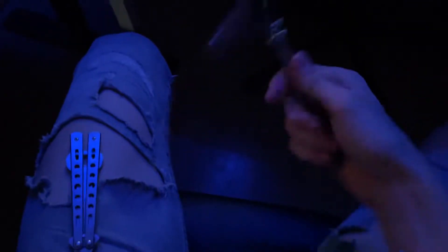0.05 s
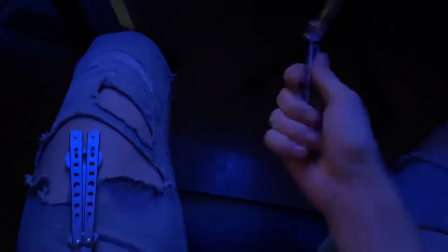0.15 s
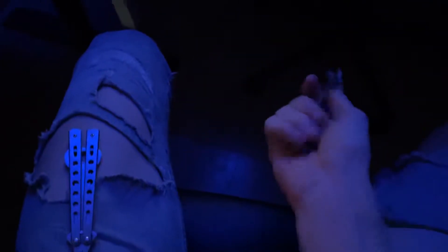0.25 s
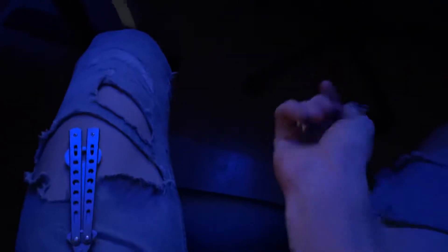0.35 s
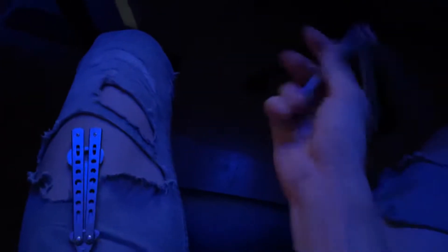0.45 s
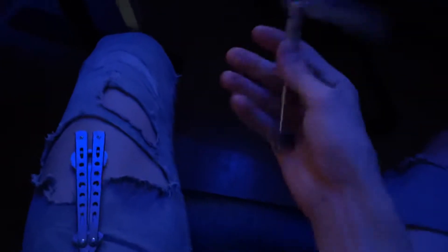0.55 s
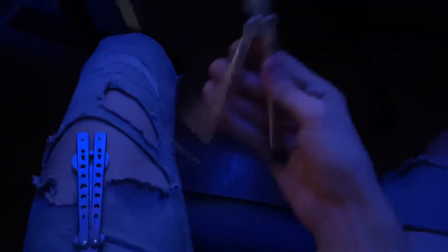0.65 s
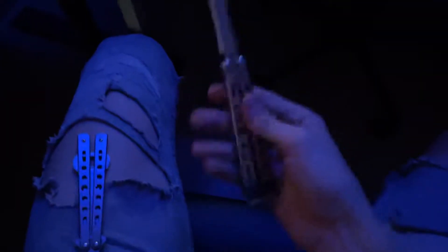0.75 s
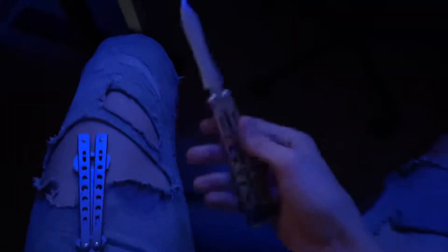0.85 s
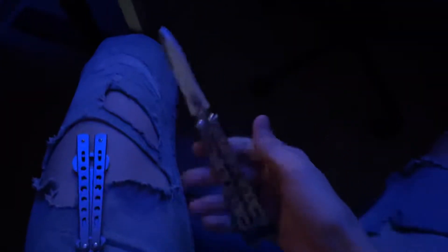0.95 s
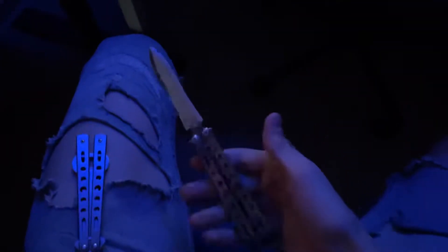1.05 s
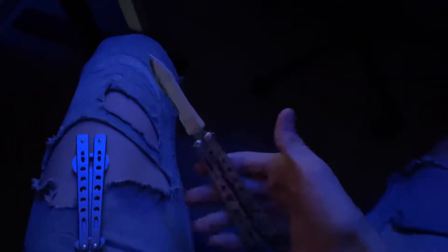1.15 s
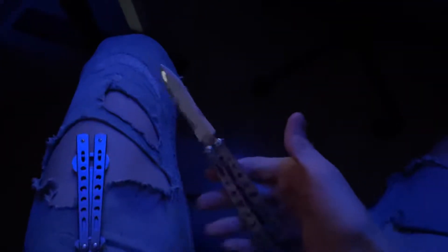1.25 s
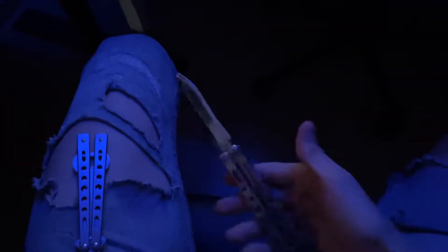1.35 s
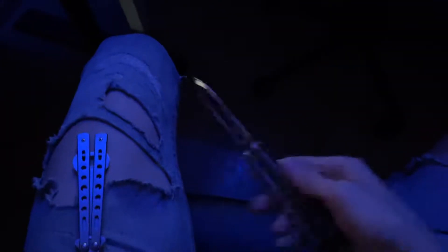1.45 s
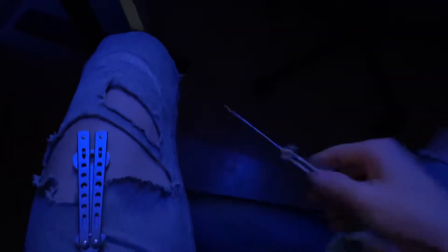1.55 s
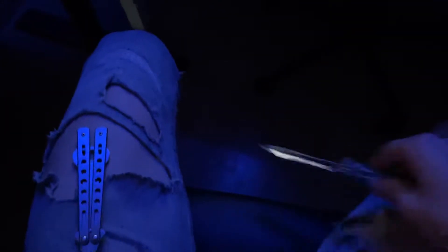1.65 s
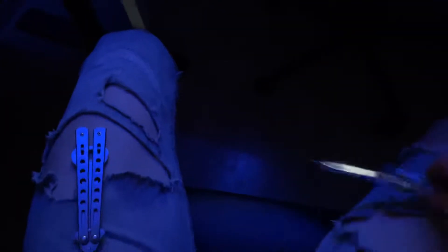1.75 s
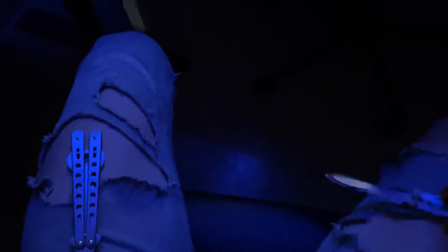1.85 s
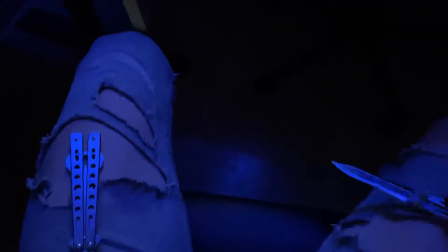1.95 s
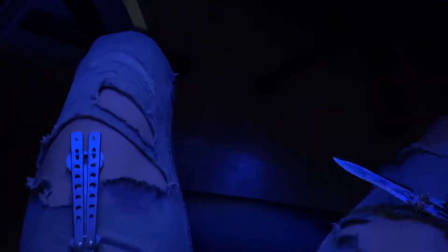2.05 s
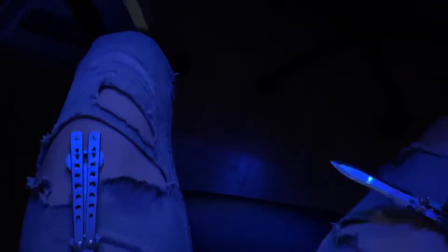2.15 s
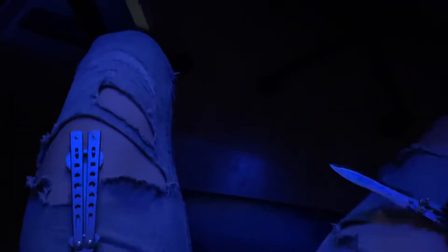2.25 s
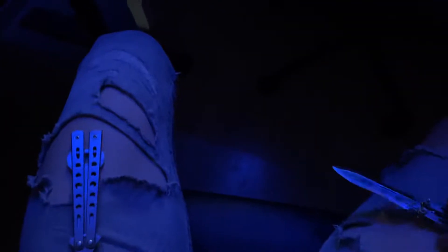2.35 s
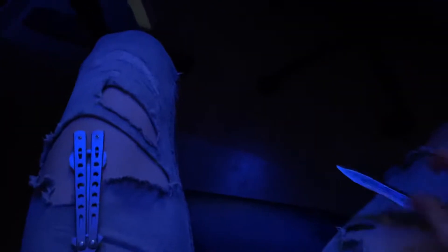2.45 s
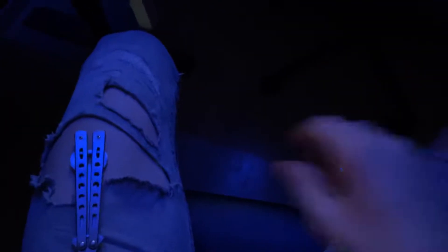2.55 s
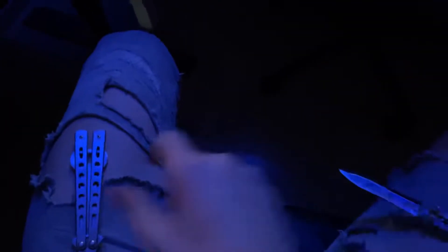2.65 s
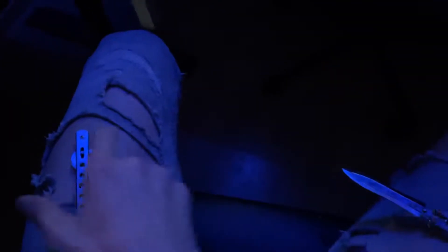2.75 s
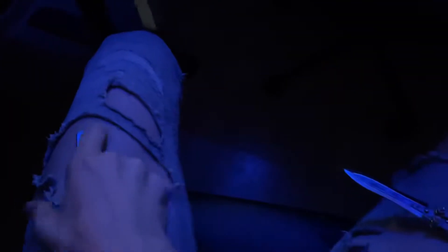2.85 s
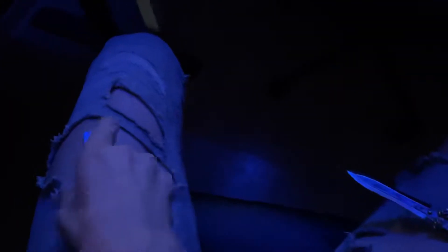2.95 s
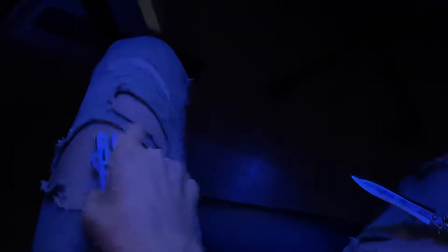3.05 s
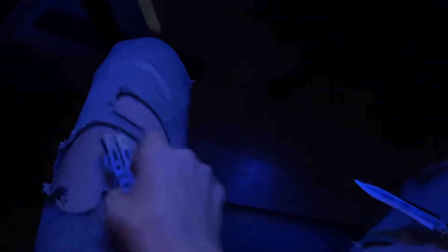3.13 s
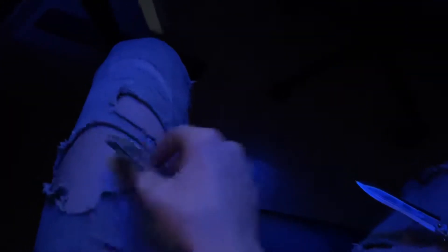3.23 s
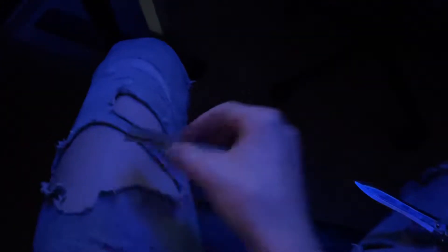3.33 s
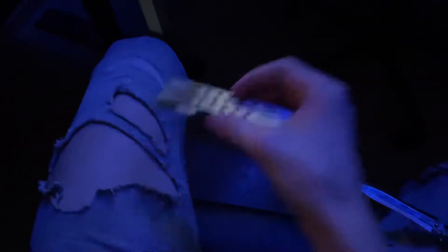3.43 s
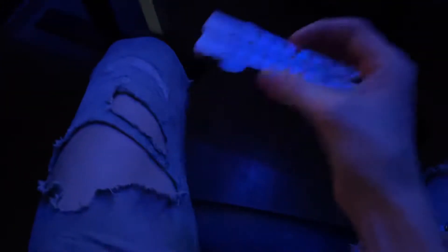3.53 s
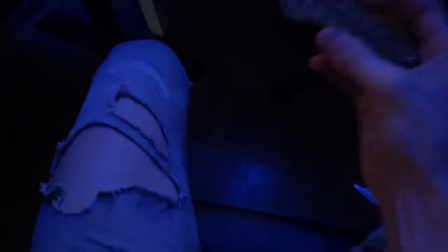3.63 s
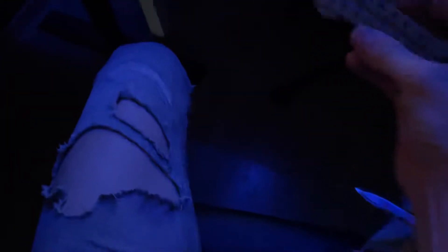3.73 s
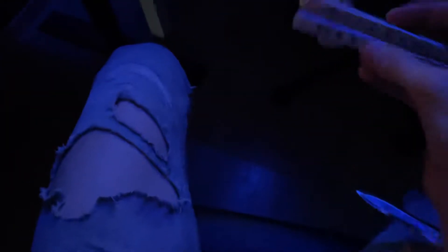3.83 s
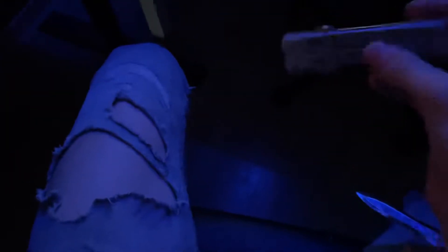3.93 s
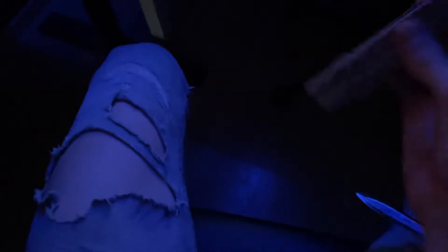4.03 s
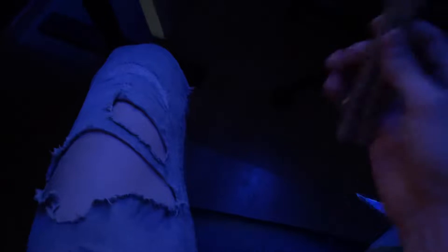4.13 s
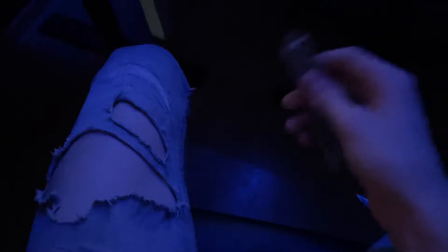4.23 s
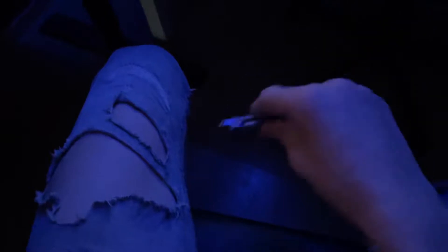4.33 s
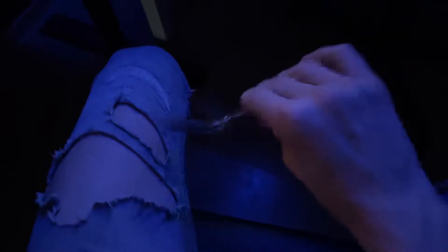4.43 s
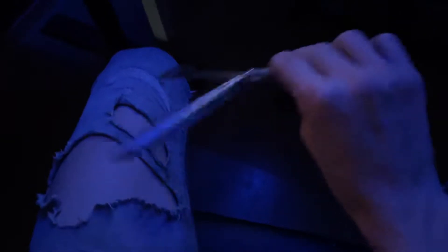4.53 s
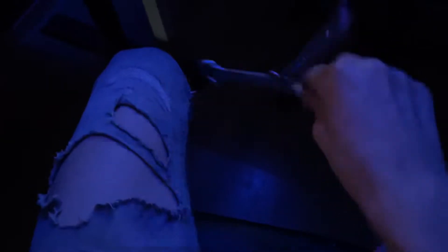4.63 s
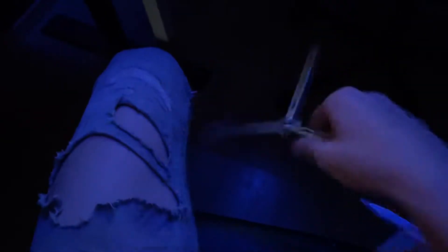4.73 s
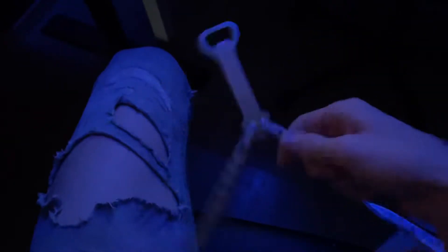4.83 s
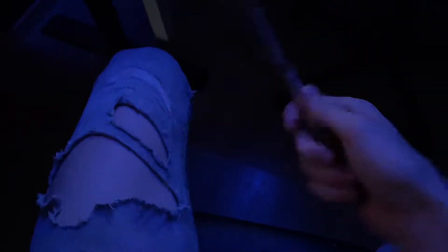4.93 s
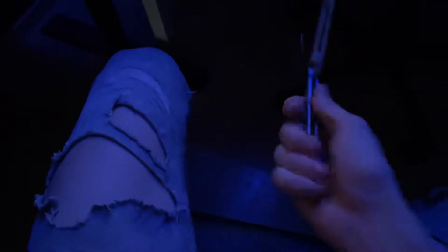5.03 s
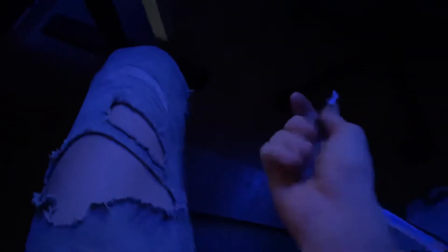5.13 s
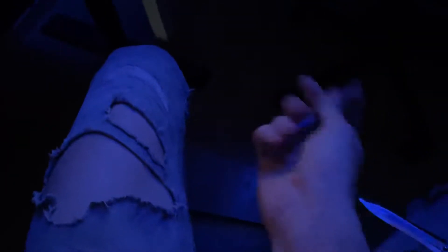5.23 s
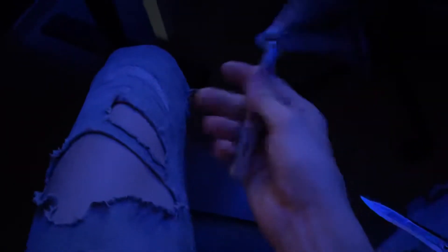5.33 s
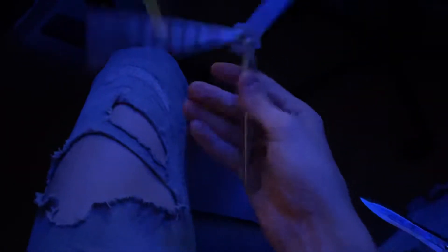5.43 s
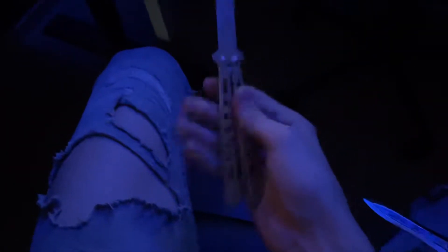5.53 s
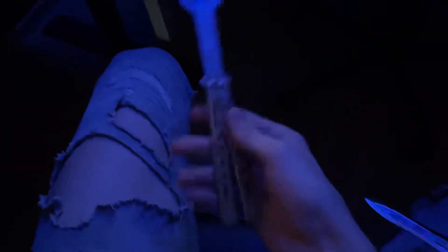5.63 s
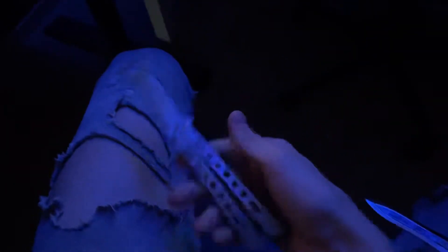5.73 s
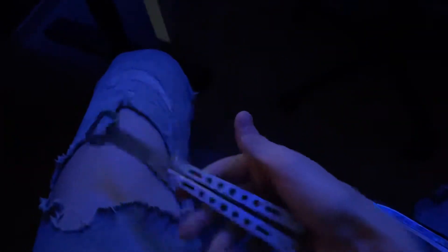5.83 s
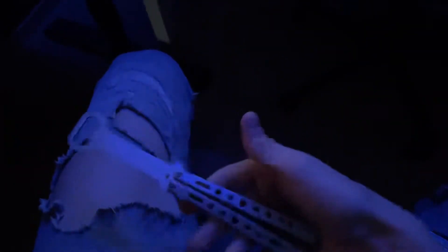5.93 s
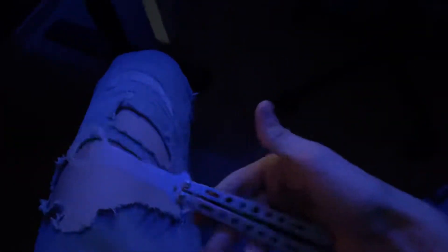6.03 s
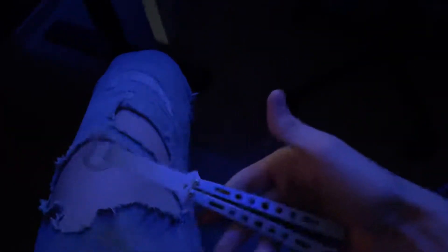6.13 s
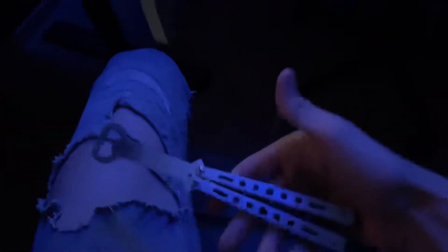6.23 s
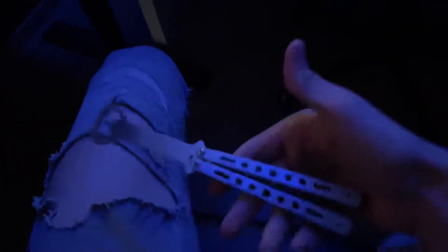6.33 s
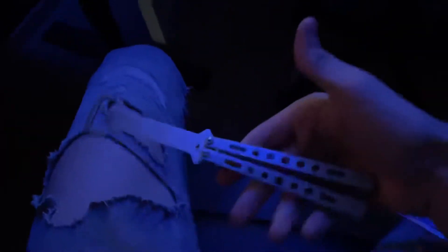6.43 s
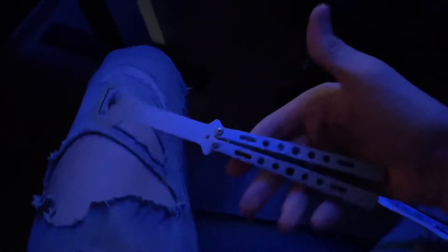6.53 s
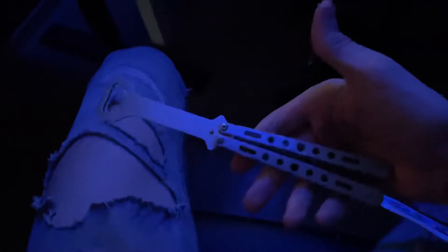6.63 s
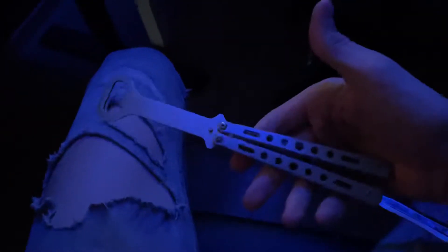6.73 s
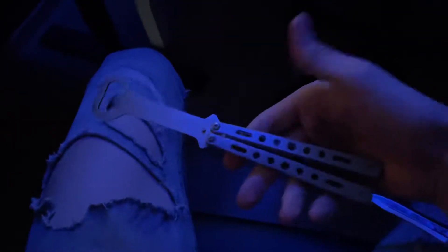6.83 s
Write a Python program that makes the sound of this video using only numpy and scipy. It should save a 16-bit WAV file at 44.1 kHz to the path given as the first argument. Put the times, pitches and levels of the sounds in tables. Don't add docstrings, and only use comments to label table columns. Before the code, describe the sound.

A phone sits close to the hands in a small furnished room, where a fan drones quietly with low hum and a faint wandering whine. From 0.1 s a folding steel knife flips with light clicks and rustling fingers, building to two loud, crisp clacks at about 0.65 s as it lands in the palm. Small clicks trail off; a soft tap comes near 1.5 s, then almost only the fan. At 2.8 s cloth and fingers rustle and a second knife ticks, with taps and pin clicks until 4.0 s. A dense rattling burst follows at 4.1-4.3 s, with short singing scrapes. One hard catch snaps at 4.6 s. Handles slam at 5.2 s, leaving a thin bright ring, and again at 5.5 s. A soft rubbing tap at 5.8 s ends the flipping, leaving the fan and barely audible ticks until nearly 7 s.

```python
import sys
import numpy as np
from scipy import signal
from scipy.fft import rfft, irfft, next_fast_len
from scipy.io import wavfile
from scipy.ndimage import uniform_filter1d

SR = 44100
rng = np.random.default_rng(int(sys.argv[2]) if len(sys.argv) > 2 else 0)


def put_to_file(sound):
    columns = np.atleast_2d(sound).T
    safe = np.clip(columns, -1, 1)
    whole_steps = np.round(safe * 32767)
    wavfile.write(sys.argv[1], SR, whole_steps.astype(np.int16))


def boost_factor(decibels):
    exponent = np.asarray(decibels, float) / 20
    return 10 ** exponent


N = 303408
KNOCK_N = 4096

# (frequency [Hz], level [dB per Hz])
FAN_MID = [(25, -26.5), (55, -4.5), (76, -14.5), (141, -3), (170, -12), (256, -5), (360, -17.5),
           (451, -9.5), (503, -22), (1480, -27.5), (2160, -40.5), (6800, -54), (7400, -56.5),
           (13000, -60.5)]
# (frequency [Hz], level [dB per Hz])
FAN_SIDE = [(24, -43), (40, -15), (140, -0.5), (167, -8), (262, -3.5), (320, -8.5), (455, -4.5), (697, -15),
            (1070, -9.5), (1150, -17), (1480, -14.5), (2570, -32.5), (16000, -56)]
# (frequency [Hz], width [Hz], level [dB rms])
FAN_HUM = [(46.9, 4.5, -69), (106.8, 12.7, -74.5), (140.33, 2.3, -63.5), (212.3, 17, -68),
           (340.3, 36.8, -71), (468, 4.7, -81.5), (468, 5.5, -75), (1072, 4, -81)]
# (time [s], frequency [Hz], level [dB])
FAN_WHINE = [(0, 1450, -98), (0.699, 1452, -83), (1.351, 1505, -86), (1.701, 1510, -117),
             (3.098, 1510, -87.5), (3.499, 1470, -84.5), (3.999, 1440, -82), (4.799, 1430, -94.5),
             (5.501, 1430, -83.5), (5.752, 1460, -83.5), (6.099, 1510, -82), (6.4, 1510, -88.5),
             (6.88, 1535, -87)]
# (frequency [Hz], time to fall 60 dB [s])
ROOM_RING = [(500, 0.21), (2000, 0.24), (4000, 0.25), (8000, 0.23), (14000, 0.043)]
# (frequency [Hz], left leads by [radians])
CASE_PHASE = [(6800, -3.5), (7500, -3.0), (8300, -2.1), (9650, -1.5), (11200, 0), (14500, 3.14),
              (15500, 3.7), (16500, 4)]
# (time [s], left leads by [ms])
SWING = [(.1, -0.086), (.27, -0.16), (.5, 0.069), (.63, -0.26), (.67, -0.051), (1.45, 0.25), (2.78, 0.088),
         (3.2, -0.014), (4.02, -0.047), (4.1, -.26), (4.22, 0.13), (4.29, 0.46), (4.6, -0.101), (5.0, 0.13),
         (5.2, 0.28), (5.49, -0.12)]
# (start [s], hold [s], level [dB])
RUSTLE = [
    (0.057, 0.75, -75.5),
    (1.268, 0.31, -82.5),
    (1.787, 0.53, -87.5),
    (2.808, 0.31, -67),
    (3.712, 0.35, -76),
    (4.334, 0.047, -61),
    (4.737, 0.076, -69),
    (4.987, 0.21, -80),
    (5.33, 0.16, -73.5),
    (5.843, 0.34, -89.5),
]
# (frequency [Hz], level [dB per Hz])
RUSTLE_COLOUR = [(1200, -28.5), (2200, -11), (4500, -6.5), (8000, -2.5), (12500, -13), (14000, -20)]
# (time [s], level [dB], frequency [Hz])
THUMPS = [
    (0.671, -44, 78.6),
    (1.527, -45, 47),
    (3.4, -44.5, 772),
    (4.602, -29.5, 320),
    (4.606, -34, 124),
    (5.498, -45, 90.3),
]
# (start [s], hold [s], high mode level [dB], low mode level [dB])
SKIDS = [
    (4.091, .006, -42, -41),
    (4.274, .007, -40, -54),
    (4.291, 0.012, -34, -47),
    (4.3065, .005, -30, -32),
    (4.316, .004, -35, -34),
    (5.468, .009, -46, -47),
]
# (frequency [Hz], flutter width [Hz])
SKID_MODES = [(8160, 90), (5150, 29.64)]
# (time [s], level [dB])
LINGER = [
    (2.79, -78),
    (2.9, -76),
    (4.108, -83),
    (4.318, -56.5),
    (4.606, -55),
    (5.187, -40),
    (5.252, -50.5),
    (5.497, -66),
]
# (frequency [Hz], width [Hz], level [dB])
LINGER_MODES = [(2800, 110, -11), (3600, 160, -12), (4400, 200, -11), (5115, 110, -8), (5800, 200, -10),
                (6700, 220, -6), (8250, 200, -3), (9030, 200, -6), (10200, 230, 2), (11200, 300, -4),
                (15600, 150, 5)]
# (frequency [Hz], left minus right [dB])
BLADE_PAN = [(5500, -2), (7800, 5), (8800, 5.5), (10000, -1)]
# (frequency [Hz], level [dB], time to fall 60 dB [s])
STEEL_A = [(3091, -7, .01), (3850, 5.5, 0.0043), (4592, -5.5, 0.027), (5420, 1.5, 0.0333), (6000, -5, 0.03),
           (6810, -8.5, .025), (7300, -16, 0.041), (7950, -7.5, 0.024), (9100, 3.5, 0.016),
           (8977, -4, .022), (10200, -19.5, 0.034), (11400, -23.5, 0.028), (13300, 0, 0.023),
           (15230, -7.5, .03)]
# (frequency [Hz], level [dB], time to fall 60 dB [s])
STEEL_B = [(1076, -18.5, 0.098), (2837, -5, 0.013), (3657, -16.5, 0.034), (4455, -16.5, 0.025),
           (5100, -5, 0.04), (6590, -2, 0.043), (7220, -12, 0.025), (8254, 10, 0.018), (9000, -0.5, 0.058),
           (9600, -19.5, 0.024), (10200, 5.5, 0.016), (10840, 0.5, 0.0072), (12500, -11, 0.032),
           (14000, -15, 0.028), (15600, -2.5, .045)]
# (frequency [Hz], level [dB])
CRACK = [(800, -48.5), (2000, -13), (3000, -11), (4500, 0.5), (6500, 3), (10000, -6.5), (13000, -1),
         (15700, 1.5), (17500, -17)]
# (time [s], level [dB], chatter [ms], brightest [Hz])
CLICKS_A = [(.062, -40, 2.3, 7840), (.1112, -37.5, 3.3, 6350), (.2522, -56, 2.5, 5560),
            (.285, -61, 36, 5000), (.3165, -49, 2.6, 9000), (.4866, -61.5, 11, 8900),
            (.504, -56.5, 21, 3660), (.5505, -52, 5.2, 4000), (.5697, -47, 2.9, 7800),
            (.581, -32.5, 0.62, 9700), (.6, -47, 40, 4174), (.627, -38.5, 4.6, 9000),
            (.6338, -22.5, 3.4, 4700), (.6382, -13, 1.9, 9100), (.638, -23, 2, 13500),
            (.65, -31.5, 9.2, 9000), (.667, -35.5, 2.9, 6000), (.6719, -7.5, 1.2, 9100),
            (.672, -11.5, 2.4, 5900), (.672, -21, 2, 13300), (.6745, -21.5, 3.6, 8880), (.75, -45, 5, 4940),
            (.8173, -42, 0.72, 9000), (.833, -53, 3, 9000), (.428, -63.5, 5.4, 11870),
            (1.3387, -60, 3.66, 8100), (1.4541, -32.5, 3.1, 9620), (.1407, -60, 2.5, 5000),
            (2.1615, -54.5, 3.2, 5960), (2.2753, -59, 4.4, 15050)]
# (time [s], level [dB], chatter [ms], brightest [Hz])
DULL_A = [
    (1.4814, -40, 4, 4500),
    (.2748, -33, 1.9, 11500),
    (.275, -35, 2, 6500),
    (.672, -22, 3.5, 3200),
    (0.2675, -49, 2, 8500),
]
# (time [s], level [dB], chatter [ms], brightest [Hz])
TICKS_B = [(2.783, -26.5, 4.3, 8200), (2.838, -51, 4.4, 3980), (2.885, -67, 4, 6500),
           (2.8937, -27, 2.4, 6300), (2.894, -25, 1.1, 10400), (2.9754, -36, 2.5, 11000),
           (2.976, -37, 2.5, 5000), (3.3285, -40, 4.3, 7800), (3.4173, -50, 3.5, 7400),
           (3.5894, -57, 1.8, 15000), (3.7293, -37.5, 4.3, 15400), (3.7426, -44, 2.1, 10700),
           (3.7633, -49.5, 1.3, 5300), (3.83, -57, 3, 14000), (3.8666, -29.5, 1.6, 15100),
           (3.9905, -45, 2.6, 8100), (4.0149, -29.5, 2.5, 14000), (4.075, -56, 4.2, 6590),
           (4.4589, -36, 1.3, 10200), (4.4982, -46, 8.4, 10200), (4.5184, -44.5, 13, 15300),
           (4.5543, -38.5, 8.3, 6400), (4.8932, -47, 4.2, 6660), (4.972, -43.5, 2.5, 5100),
           (4.978, -45.5, 3.5, 10200), (5.0601, -61, 1.9, 14600), (5.0879, -57.5, 2.4, 6740),
           (5.1465, -50, 3.8, 5340), (5.398, -67, 2.4, 10200), (5.549, -62, 2.5, 10200),
           (5.662, -60, 4.1, 5300), (6.4494, -71, 4.9, 10550), (6.8678, -68, 3.2, 11400)]
# (time [s], level [dB], chatter [ms], brightest [Hz])
CLACKS_B = [(4.0893, -26.5, 3.3, 10500), (4.094, -29, 4.2, 8300), (4.1015, -19, 2.6, 10200),
            (4.102, -23, 2.4, 13500), (4.1052, -14, 0.9, 12500), (4.108, -20, 1.6, 11700),
            (4.1352, -22.5, 3, 10200), (4.1355, -26.5, 3, 15300), (4.22, -27, 1.9, 9350),
            (4.2717, -30, 3, 10800), (4.2795, -34.5, 3, 8300), (4.324, -55.5, 1.6, 10200),
            (4.6055, -7, 1, 10900), (4.608, -21, 2.6, 10840), (5.1695, -25, 2.3, 10200),
            (5.172, -23, 2.6, 6900), (5.173, -24.5, 4.3, 5100), (5.179, -28.5, 2, 10200),
            (5.182, -15, 2.2, 10200), (5.1845, -14.5, 4, 10200), (5.1835, -13.5, 2.1, 5200),
            (5.1885, -26, 10, 10150), (5.2315, -33.5, 9.6, 10100), (5.2471, -18, 2.4, 12500),
            (5.2525, -25, 7.5, 10500), (5.464, -27.5, 2.5, 11700), (5.4645, -26.5, 2, 6500),
            (5.4698, -35, 4, 7000), (5.4803, -27, 2.4, 6600), (5.4815, -21.5, 2.2, 10700),
            (5.4915, -29.5, 4.6, 8960), (5.4945, -15.5, 3.2, 11500), (5.4978, -16.5, 3.8, 10840),
            (5.5045, -29, 3, 12000), (5.506, -36, 2.3, 6590)]
# (time [s], level [dB], chatter [ms], brightest [Hz])
RINGS_B = [(2.8188, -48, 9.4, 8140), (3.7165, -46, 3.8, 2810), (4.091, -34.5, 3, 2730),
           (4.105, -25.5, 3.4, 3620), (4.2068, -46, 3.7, 5200), (4.279, -27, 2, 8200),
           (4.2915, -20, 2, 11600), (4.2945, -30, 3.7, 10200), (4.301, -27, 2.4, 10200),
           (4.2925, -29.5, 5, 4503), (4.293, -39, 6.5, 2580), (4.306, -23.5, 2.55, 10200),
           (4.3095, -18.5, 2.3, 15600), (4.315, -30.5, 4.9, 8300), (4.386, -40.5, 19, 10200),
           (4.7699, -50, 2.2, 7760), (4.7996, -52.5, 1.5, 5420), (5.0015, -49, 1.8, 6697),
           (5.246, -28, 6.7, 2587)]
# (time [s], level [dB], chatter [ms], brightest [Hz])
DULL_B = [
    (3.0936, -39, 4.5, 10100),
    (3.1535, -31.5, 1.55, 12900),
    (3.5949, -52, 2.56, 14620),
    (3.7151, -40, 4.1, 9630),
    (4.6006, -17, 0.66, 11700),
    (4.6023, -12.5, 0.9, 11000),
    (4.7207, -35, 12, 15700),
    (5.4946, -16, 2.07, 6100),
    (5.7949, -33.5, 5, 14800),
]
# (time [s], level [dB], chatter [ms], brightest [Hz])
FLEX_B = [
    (5.17, -37, 9.5, 1140),
    (5.495, -26.5, 2.1, 2210),
    (6, -76, 4.6, 1002),
]


def shape(table, hz):
    table = np.array(table, float)
    return np.interp(np.log(hz + 1), np.log(table[:, 0] + 1), table[:, 1])


def coloured(gain, db):
    x = irfft(rfft(rng.standard_normal(N)) * gain, N)
    return x * boost_factor(db) / x.std()


def walk(rate):
    k = int(SR / rate)
    steps = np.repeat(rng.standard_normal(N // k + 1), k)
    x = uniform_filter1d(uniform_filter1d(steps, k), k)[:N]
    return x / x.std()


def stroke(start, hold, db, rise_db_s, fall_db_s):
    t = np.arange(N) / SR - start
    return boost_factor(db + rise_db_s * np.minimum(t, 0) - fall_db_s * np.maximum(t - hold, 0))


def add(track, s, x):
    i = int(s * SR)
    track[..., i:i + x.shape[-1]] += x[..., :N - i]


def ports(spectrum, hz, lead_ms):
    case = np.clip((hz - 6000.) / 1690.0, 0, 1)
    delay = 2 * np.pi * hz * lead_ms / 1000
    lead = (1 - case) * delay + case * shape(CASE_PHASE, hz)
    return spectrum * np.exp(.5j * np.array([lead, -lead]))


def fan():
    mid_db, side_db, pan_db = -59, -64.5, 2.5
    hz, t = np.fft.rfftfreq(N, 1 / SR), np.arange(N) / SR
    soft = 1 / (1 + (hz / 13200.) ** 20)
    mid = coloured(soft * boost_factor(shape(FAN_MID, hz)), mid_db) * boost_factor(0.077 * walk(3.3))
    for f, width, db in FAN_HUM:
        mid = mid + coloured(1 / (1 + ((hz - f) / (width / 2)) ** 2), db)
    side = coloured(soft * boost_factor(shape(FAN_SIDE, hz)), side_db)
    s, whine_hz, whine_db = np.transpose(FAN_WHINE)
    whine_gain = boost_factor(np.interp(t, s, whine_db) + 6.5 + 1.7 * walk(11))
    mid = mid + whine_gain * np.sin(2 * np.pi * np.cumsum(np.interp(t, s, whine_hz)) / SR)
    return np.array([mid + side, mid - side]) * boost_factor([[pan_db / 2], [-pan_db / 2]])


def room(x):
    room_db, tilt_db_per_octave = -9, -4
    t, hz = np.arange(SR // 2) / SR, np.fft.rfftfreq(SR // 2, 1 / SR)
    tail = 0
    for centre_hz in 250 * 2. ** np.arange(7):
        band = np.exp(-.5 * (np.log2((hz + 1) / centre_hz) / .5) ** 2)
        band = band * boost_factor(tilt_db_per_octave * np.log2(centre_hz / 1000))
        band = band / (1 + (hz / 15900.) ** 20)
        noise = irfft(rfft(rng.standard_normal((3, len(t)))) * band, len(t))
        tail = tail + noise * 1000. ** (-t / shape(ROOM_RING, centre_hz))
    tail = tail * (1 - np.exp(-(t / 0.001) ** 2))
    tail = tail * boost_factor(room_db) / np.sqrt(np.sum(tail[0] ** 2))
    return signal.fftconvolve(x[None], tail, axes=1)[:, :N]


def rustle():
    hiss, hz = 0, np.fft.rfftfreq(N, 1 / SR)
    for centre_hz in (2200, 3000, 4000, 5100, 6600, 8300, 10400, 12500):
        patch = np.exp(-.5 * (np.log2((hz + 1) / centre_hz) / .17) ** 2)
        band = boost_factor(shape(RUSTLE_COLOUR, hz)) * patch
        hiss = hiss + irfft(rfft(rng.standard_normal(N)) * band, N) * boost_factor(4 * walk(22))
    grain_db = .8 * walk(90) + 2.5 * walk(500)
    hiss = hiss / hiss.std() * boost_factor(grain_db)
    return hiss * sum(stroke(*move, rise_db_s=398.5, fall_db_s=139.5) for move in RUSTLE)


def palm():
    out, t = np.zeros(N), np.arange(KNOCK_N) / SR
    for s, db, hz in THUMPS:
        add(out, s, boost_factor(db) * np.sin(2 * np.pi * hz * t) * np.exp(-t * hz / 0.77))
    return out


def skid():
    out = np.zeros(N)
    for k, (f, width) in enumerate(SKID_MODES):
        flutter = np.sqrt(2) * boost_factor(2.5 * walk(300))
        tone = flutter * np.sin(2 * np.pi * np.cumsum(f + width * walk(250)) / SR)
        fall_db_s = (1900, 999.5)[k]
        out += tone * sum(stroke(start, hold, db[k], 3493.5, fall_db_s) for start, hold, *db in SKIDS)
    return out


def linger():
    hz = np.fft.rfftfreq(N, 1 / SR)
    ring = sum(coloured(1 / (1 + ((hz - f) / width) ** 4), db) for f, width, db in LINGER_MODES)
    return ring * sum(stroke(s, 0, db, rise_db_s=3493.5, fall_db_s=259.5) for s, db in LINGER)


def knife(kinds, steel, scatter_db, spread):
    t, hz = np.arange(KNOCK_N) / SR - .002, np.fft.rfftfreq(KNOCK_N, 1 / SR)
    f, db, t60 = np.repeat(np.transpose(steel), repeats=3, axis=1)[:, :, None]
    body = 1 / (1 + 1j * 0.41 * (hz / 1270.0 - 2100.0 / (hz + 1)))
    fade_out = np.clip((t[-1] - t) / .03, 0, 1)
    out = np.zeros((3, N))
    knocks = [(*knock, ring_db, body_db) for table, ring_db, body_db in kinds for knock in table]
    for s, level_db, ms, bright_hz, ring_db, body_db in knocks:
        noise = rng.standard_normal(KNOCK_N)
        grit = np.minimum(rng.exponential(size=KNOCK_N // 24), 3.5)
        grip = rng.standard_normal((3, len(f), 1))
        spurts = boost_factor(2.2 * np.repeat(grit, 25)[:KNOCK_N])
        age = t / (ms / 1000)
        swell = np.clip(1 - np.exp(-t / 0.00062), 0, 1)
        chatter = rfft(noise * spurts * swell * np.exp(-.6 * age - .5 * age ** 2))
        focus = .4 + 1.5 / (1 + 2.4j * (hz / bright_hz - bright_hz / (hz + 1)))
        struck_db = 6 * np.exp(-(np.log(f / bright_hz) / .05) ** 2)
        fade = np.log(1000) / (np.clip(t60, .01, .07) * np.exp(0.18 * grip[0]))
        mode_gain = boost_factor(db + struck_db + scatter_db * grip[1]) * 140.0
        mode_hz = f * (1 + spread * grip[2])
        modes = mode_gain / (fade + 2j * np.pi * (hz - mode_hz))
        bright = chatter * focus * (boost_factor(shape(CRACK, hz)) + boost_factor(ring_db + 9.0) * modes.sum(axis=0))
        dull = chatter * body
        bright_peak, dull_peak = [np.sqrt(uniform_filter1d(irfft(part, KNOCK_N) ** 2, size=40).max())
                                  for part in (bright, dull)]
        knock = boost_factor(level_db - 6) * (bright / bright_peak + boost_factor(body_db) * dull / dull_peak)
        heard = ports(knock, hz, np.interp(s, *np.transpose(SWING)))
        add(out, s - .0028, irfft(np.vstack([knock, heard]), KNOCK_N) * fade_out)
    return out


def first_knife():
    kinds = [(CLICKS_A, -5, -29.5), (DULL_A, -22.5, -8)]
    return knife(kinds, STEEL_A, scatter_db=4.0, spread=0.054)


def second_knife():
    kinds = [(TICKS_B, -6, -33.5), (CLACKS_B, -13.5, -43), (RINGS_B, 3.5, -44),
             (DULL_B, -14.5, -17), (FLEX_B, 8.95, -1.5)]
    return knife(kinds, STEEL_B, scatter_db=1.0, spread=0.013)


def scene():
    steel = first_knife() + second_knife()
    hand, sing, ring = rustle(), skid(), linger()
    size = next_fast_len(N)
    hz = np.fft.rfftfreq(size, 1 / SR)
    skid_room_db = -5
    tails = rfft(room(steel[0] + hand + ring + boost_factor(skid_room_db) * sing), size)
    wide = 0.76 / (1 + (hz / 6500.) ** 6)
    near = ports(rfft(hand, size) + np.sqrt(1 - wide) * tails[0], hz, lead_ms=-0.036)
    near = near + np.sqrt(wide) * tails[1:]
    blade_pan = boost_factor(np.outer([.5, -.5], shape(BLADE_PAN, hz)))
    near = near + ports(rfft(sing + ring, size), hz, lead_ms=0.32) * blade_pan
    return steel[1:] + irfft(near, size)[:, :N] + palm() + fan()


def top_cut(x):
    return signal.sosfilt(signal.butter(12, 17130, fs=SR, output="sos"), x)


def record(dry):
    no_bass = signal.butter(4, 40., "highpass", fs=SR, output="sos")
    no_top = signal.ellip(8, .3, 60, 16300., fs=SR, output="sos")
    band = signal.sosfilt(no_top, signal.sosfilt(no_bass, dry))
    return top_cut(band)


dry = scene()
out = record(dry)
put_to_file(out)
```